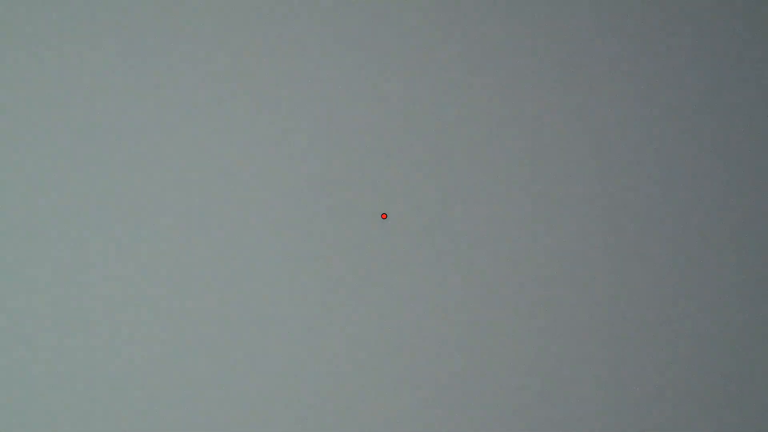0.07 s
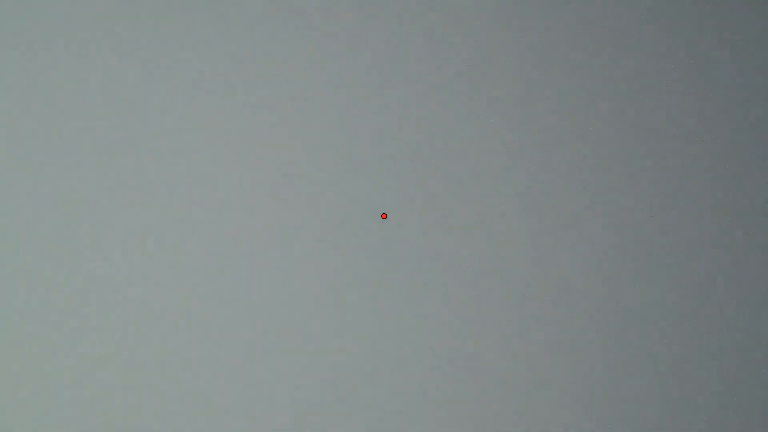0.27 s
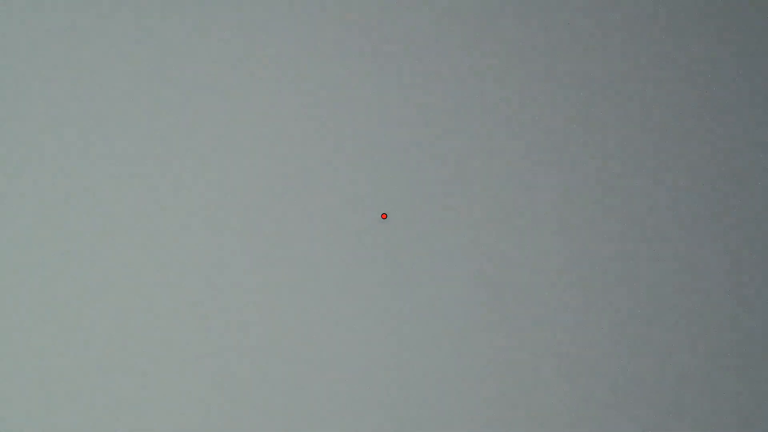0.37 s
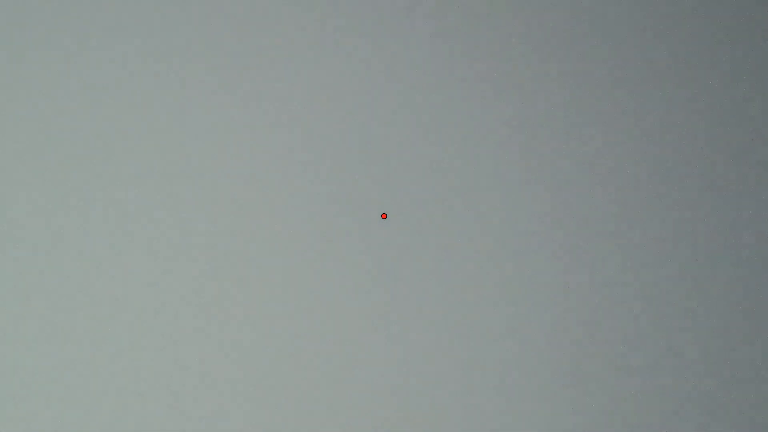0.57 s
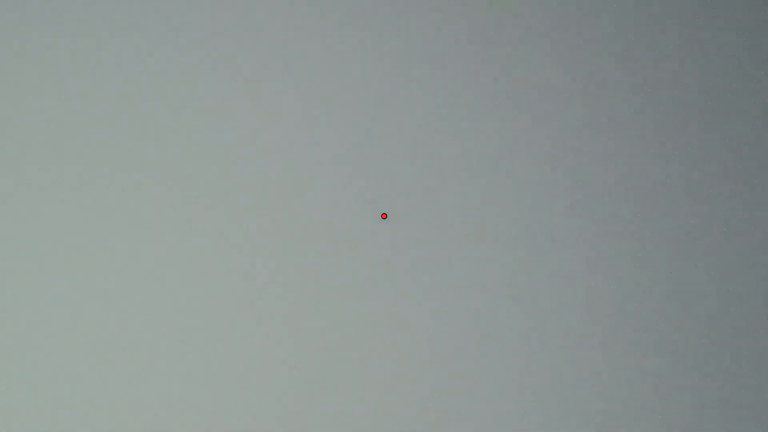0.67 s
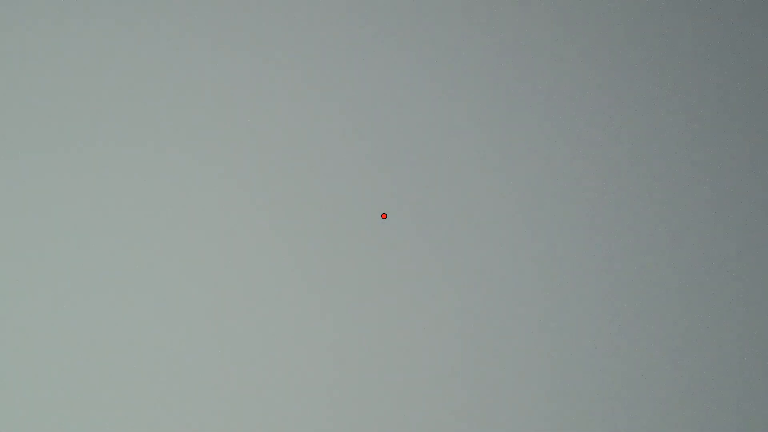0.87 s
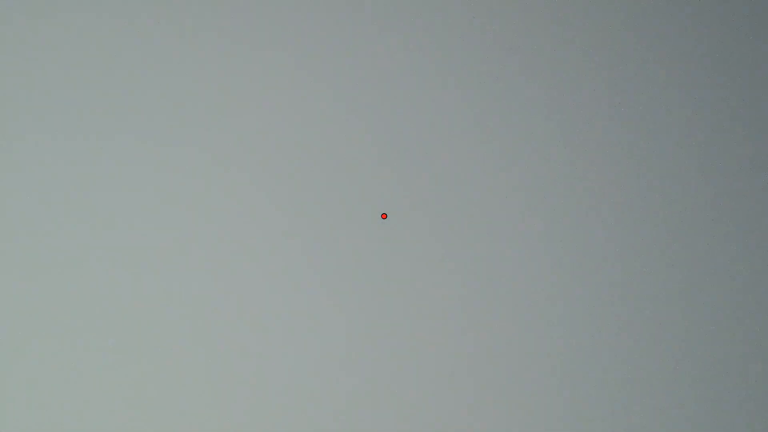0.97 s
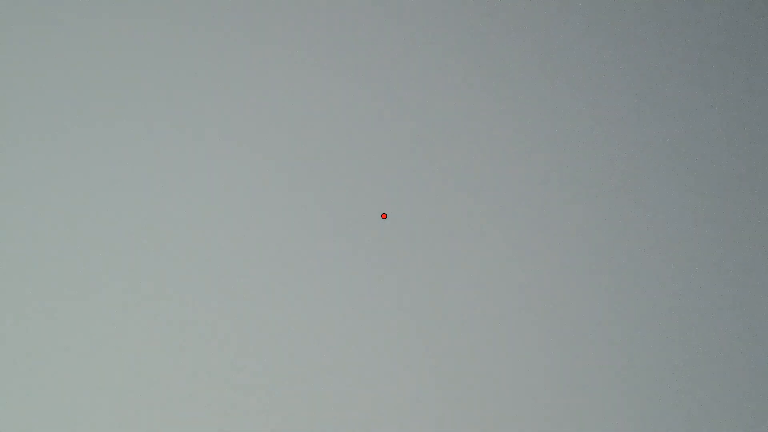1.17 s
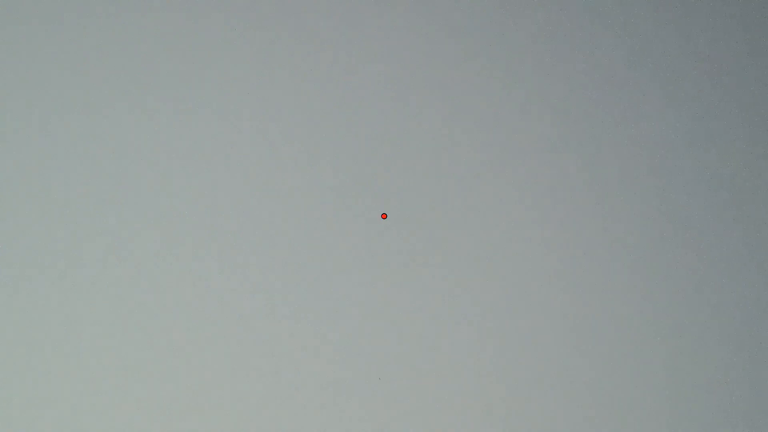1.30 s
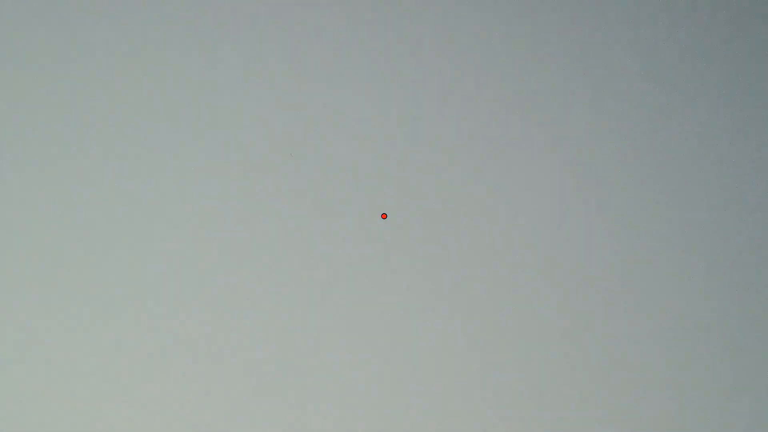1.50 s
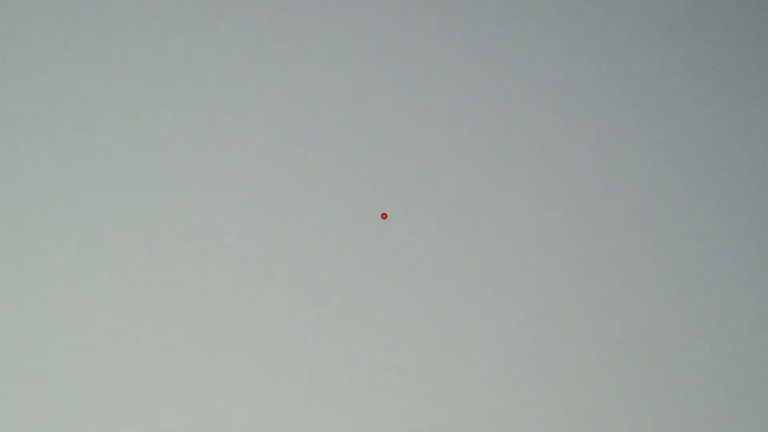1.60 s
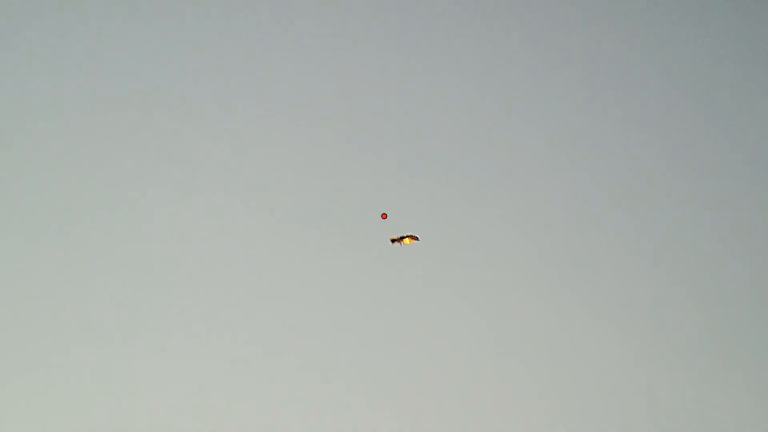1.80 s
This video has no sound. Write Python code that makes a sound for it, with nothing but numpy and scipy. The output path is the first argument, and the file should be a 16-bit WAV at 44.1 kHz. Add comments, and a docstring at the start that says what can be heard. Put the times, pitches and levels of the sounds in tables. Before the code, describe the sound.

A shotgun fires once, right beside the microphone, with a distorted bang. A booming echo rolls back across open ground with a few dull slaps, then faint handling ticks follow over light wind and hiss.

```python
"""One shotgun shot over open ground, heard by a small camera fixed to the gun.
At first a faint hollow hum wavers over the light wind and hiss that lie under the whole scene.
At 0.21 s the blast and its near reflections overload the microphone and ring the hollow mount.
Ground, trees and terrain then scatter back a rolling echo, and far obstacles return a few dull slaps.
Last come small handling ticks."""
import sys
import numpy as np
from scipy import signal
from scipy.fft import rfft, irfft, next_fast_len
from scipy.io import wavfile

SR = 44100
rng = np.random.default_rng(int(sys.argv[2]) if len(sys.argv) > 2 else 0)


def to_wav(sig):
    """Store sig (one row per channel, or 1-D mono) as 16-bit WAV at the path in sys.argv[1].

    Samples outside -1..1 are clipped; the rate is SR.
    """
    pcm = np.clip(np.atleast_2d(sig), -1, 1) * 32767
    pcm = np.round(pcm).astype(np.int16)
    wavfile.write(sys.argv[1], SR, pcm.T)  # frames by channels


N = 81585
TIME = np.arange(N) / SR
SHOT_S = .2113

# Spectrum of outdoor air and microphone hiss (frequency [Hz], relative density [dB])
AIR_SPECTRUM = [(10, 8.5), (30, 2.5), (70, -4.5), (150, -8.5), (270, -9), (350, -20), (540, -19.5),
                (670, -14.5), (850, -22.5), (1080, -22), (1500, -25.5), (3000, -28.5), (7500, -31)]
# Wind buffeting the microphone as the gun swings (time [s], level [dB])
WIND_LEVELS = [(0, -59), (.5, -53.5), (.75, -58), (1.05, -51), (1.35, -54.5), (1.44, -59), (1.53, -48.5),
               (1.85, -55.5)]
# Hollow hum before the shot (time [s], frequency [Hz], level [dB])
UPPER_HUM = [(0, 263, -39), (.045, 272.2, -36.5), (.07, 260.2, -46.5), (.11, 253.6, -50.5), (.14, 244, -56),
             (.21, 260, -59.5)]
# Its fainter lower tone (time [s], frequency [Hz], level [dB])
LOWER_HUM = [(0, 166.3, -73), (.06, 178.7, -55), (.12, 190.9, -54.5), (.21, 198, -56)]
# Handling contacts (time [s], burst gain [dB], low-pass cutoff [Hz], mount ring gain [dB])
HANDLING_TICKS = [(1.262, -53, 900, -63), (1.268, -51, 1400, -62), (1.5233, -42.5, 1300, -56),
                  (1.536, -53, 2588, -60)]
# Late reflections from far obstacles (time [s], gain [dB])
SLAP_ARRIVALS = [(.660, -47), (.854, -36), (.887, -40.5), (.936, -43)]
# Hollow note of a far slap (frequency [Hz], relative level [dB], T60 [s])
THUD_MODES = [(270, 0, .13), (302.41, -9, .08), (681.76, -14, .08), (1091, -23, 0.0491)]
# Returns from belts of trees (time [s], level [dB], 1/e half-width [s], band centre [Hz])
TREE_RETURNS = [(.285, -30, 0.03356, 95), (0.314, -24.5, 0.017, 240), (.45, -44, .045, 700),
                (.665, -51, .018, 720), (.74, -68, 0.09087, 2080), (0.821, -50, 0.03755, 100),
                (1.2, -57.5, 0.07257, 125.9)]
# Spectrum of the scattered echo, heard through the mount (frequency [Hz], relative density [dB])
ECHO_SPECTRUM = [(25, -7.5), (100, -4.5), (180, -7.5), (245, 2.5), (300, 3), (375, -12.5), (560, -14.5),
                 (690, -3), (810, -11.5), (980, -14.5), (1090, -9.5), (1400, -25.5), (1600, -22),
                 (2100, -24.5), (2900, -34), (3800, -29.5), (4400, -39), (5500, -37), (7500, -46)]
# Decay of the echo from far terrain (frequency [Hz], T60 [s])
FAR_DECAY = [(50, 1.5), (270, 1.25), (700, 1.3), (1200, 1.15), (1700, .95), (2200, 1.1), (3000, .8),
             (3900, .9), (7000, 0.57)]
# Decay of the echo from near ground and trees (frequency [Hz], T60 [s])
NEAR_DECAY = [(50, 0.47), (270, 0.41363), (700, 0.45), (1500, .35), (3000, 0.35), (7000, .42)]
# Modes of the gun and the camera's hollow mount (frequency [Hz], relative level [dB], T60 [s])
MOUNT_MODES = [(161, 13.5, 0.019), (247.24, -3, 0.099), (268.61, -11, 0.14), (626.87, -20, 0.12),
               (700.08, 5, 0.042317), (848.58, -6, 0.031), (1064.8, 0, 0.047), (1239.5, -13.5, 0.04),
               (1543.2, -14.5, .052), (1643.8, -11, .047), (2069.1, -13, 0.074), (2688.8, -13.5, .044)]
# Spectrum of the turbulent crackle (frequency [Hz], relative density [dB])
CRACKLE_SPECTRUM = [(30, -12), (200, -12), (430, -22), (700, -1), (1100, 0), (1800, -1.5), (3000, -12),
                    (4000, -11), (6000, -12), (8000, -22)]
# Muzzle blast and near reflections (time [s], pulse gain [dB], push length [ms], crackle level [dB])
WAVE_FRONTS = [(0.2112, 17, .38, -6), (0.2145, -2, 0.55, -8.5), (0.2371, -8, 0.18, -30.5),
               (.2444, -4.5, 0.18, -31)]


def amp(db):
    """Decibels to amplitude ratio."""
    return 10 ** (np.asarray(db) / 20)


def unit(x):
    """Normalisation to rms 1."""
    return x / np.sqrt(np.mean(x ** 2) + 1e-20)


def read(points, hz):
    """Interpolation of a table on a log-frequency axis."""
    knots_hz, values = np.transpose(points)
    return np.interp(np.log(hz + 1), np.log(knots_hz + 1), values)


def add(mix, start_s, sound):
    """Superposition: a sound joins the mix at its arrival time."""
    part = mix[round(start_s * SR):][:len(sound)]
    part += sound[:len(part)]


def noise(spectrum, size=N):
    """Spectral shaping: white noise takes the given spectrum, at rms 1."""
    padded = next_fast_len(size, True)
    white = rfft(rng.standard_normal(padded))
    gain = amp(read(spectrum, np.fft.rfftfreq(padded, 1 / SR)))
    return unit(irfft(white * gain, padded)[:size])


def cut(x, hz, kind="low", order=2):
    """Maximally flat low-pass or high-pass filtering."""
    return signal.sosfilt(signal.butter(order, hz, kind, fs=SR, output="sos"), x)


def band_limit(x, hz):
    """Steep low-pass filtering by a windowed sinc."""
    return signal.oaconvolve(x, signal.firwin(255, hz, window=("kaiser", 8), fs=SR), "same")


def fade(t60, size):
    """Exponential decay: 60 dB in t60 seconds."""
    return np.exp(-np.log(1000) * TIME[:size] / t60)


def ringing(modes, size=SR // 4):
    """Modal superposition: an impulse response is a sum of damped sinusoids."""
    return sum(amp(db) * fade(t60, size) * np.sin(2 * np.pi * hz * TIME[:size]) for hz, db, t60 in modes)


def air():
    """Stationary noise: outdoor air and microphone hiss keep a steady spectrum."""
    return amp(-53.5) * noise(AIR_SPECTRUM)


def wind():
    """Turbulence: air flowing past the microphone makes slow pressure fluctuations."""
    buffets = unit(cut(rng.standard_normal(N), hz=13))
    level_db = np.interp(TIME, *np.transpose(WIND_LEVELS))
    return amp(level_db) * buffets


def hum(curve):
    """Frequency and amplitude modulation: a soft tone wavers, then ends under the shot."""
    times, hz, db = np.transpose(curve)
    phase = 2 * np.pi * np.cumsum(np.interp(TIME, times, hz)) / SR
    return amp(np.interp(TIME, times, db)) * np.sin(phase) * (TIME < SHOT_S)


def handling_ticks(size=SR // 16):
    """Impact excitation: each small contact makes a noise burst and lightly rings the mount."""
    contacts, ring = np.zeros(N), ringing(MOUNT_MODES)
    for start_s, burst_db, cutoff_hz, ring_db in HANDLING_TICKS:
        burst = unit(cut(rng.standard_normal(size), cutoff_hz, order=3))
        add(contacts, start_s, amp(burst_db) * burst * fade(t60=.02085, size=size))
        add(contacts, start_s, amp(ring_db) * ring)
    return cut(contacts + 1e-12, hz=554.02, kind="high")


def far_slaps(rise_s=.003):
    """Discrete reflection: far obstacles return the blast, dulled to a hollow thud."""
    slaps, thud = np.zeros(N), ringing(THUD_MODES)
    onset = 1 - np.exp(-TIME[:len(thud)] / rise_s)
    for start_s, db in SLAP_ARRIVALS:
        add(slaps, start_s, amp(db) * thud * onset)
    return slaps


def tree_swells(edge_ratio=1.25):
    """Backscattering: each belt of trees returns a broad swell in its own frequency band."""
    swells, scatter = np.zeros(N), noise(ECHO_SPECTRUM)
    for peak_s, db, width_s, centre_hz in TREE_RETURNS:
        span = abs(TIME - peak_s) < 3 * width_s
        band = cut(scatter[span], centre_hz * edge_ratio, order=4)
        band = cut(band, centre_hz / edge_ratio, "high", order=4)
        envelope = np.exp(-((TIME[span] - peak_s) / width_s) ** 2)
        swells[span] += amp(db) * unit(band) * envelope
    return swells


def rolling_echo(decay, gain_db, rise_s):
    """Diffuse scattering: countless returns build up and die away, each band at its own rate."""
    hz, times, bands = signal.stft(noise(ECHO_SPECTRUM), SR, nperseg=512)
    damping = np.exp(-np.log(1000) * times / read(decay, hz)[:, None])
    tail = signal.istft(bands * damping, SR)[1][:N]
    onset = 1 - np.exp(-TIME / rise_s)
    echo = np.zeros(N)
    add(echo, SHOT_S, amp(gain_db) * tail * onset)
    return echo


def through_mount(pressure, ring_db=-25.5):
    """Resonance: pressure reaches the microphone directly and also drives the mount's modes."""
    ring = signal.oaconvolve(pressure, ringing(MOUNT_MODES))[:len(pressure)]
    return pressure + amp(ring_db) * ring


def blast_wave(push_ms):
    """Shock wave: a jump in pressure falls through zero into a longer suction."""
    age = TIME[:SR // 50] * 1000 / push_ms
    jump = np.where(age > 0, 1, .5)  # the first sample lies halfway up the front
    return (1 - age) * np.exp(-age) * jump


def muzzle_blast(size=SR // 8):
    """Shock radiation: the direct front and its near reflections each carry turbulent crackle."""
    fronts, crackle = np.zeros(SR // 2), np.zeros(N)
    for start_s, pulse_db, push_ms, crackle_db in WAVE_FRONTS:
        add(fronts, start_s, amp(pulse_db) * blast_wave(push_ms))
        burst = noise(CRACKLE_SPECTRUM, size) * fade(t60=.04802, size=size)
        add(crackle, start_s, amp(crackle_db) * burst)
    rounded = cut(fronts + 1e-12, hz=4200, order=1)
    return crackle + np.pad(through_mount(rounded), (0, N - len(rounded)))


def scene():
    """Linear superposition: the shot, its echoes and the quiet sounds around it sum in mono."""
    near = rolling_echo(NEAR_DECAY, gain_db=-12, rise_s=.014)
    far = rolling_echo(FAR_DECAY, gain_db=-27, rise_s=.057)
    shot = near + far + tree_swells() + far_slaps() + muzzle_blast()
    return (shot + handling_ticks() + hum(UPPER_HUM) + hum(LOWER_HUM) + air() + wind())[None]


def record(dry, overload=.98382):
    """Saturation: the input overloads, and the low-pass overshoot clips again at full scale."""
    clipped = np.clip(dry[0], -overload, overload)
    narrow = band_limit(clipped, hz=7250)
    return band_limit(np.clip(narrow, -1, 1), hz=15400)[None]


dry = scene()
out = record(dry)
to_wav(out)
```